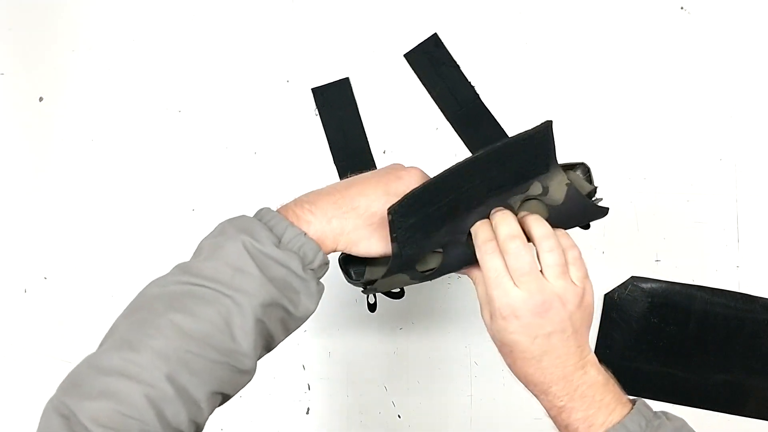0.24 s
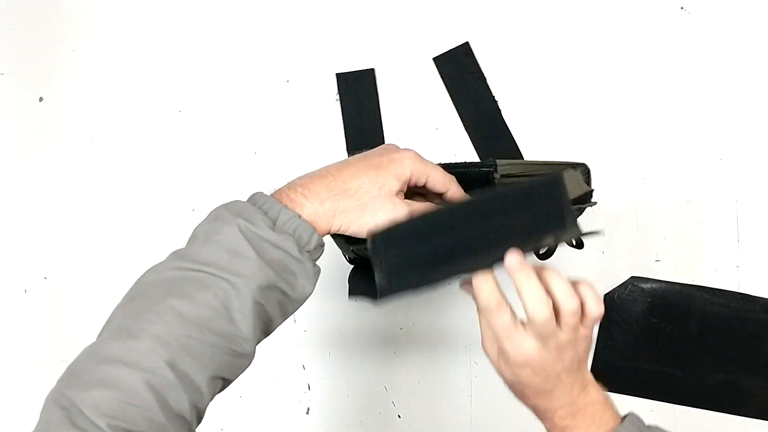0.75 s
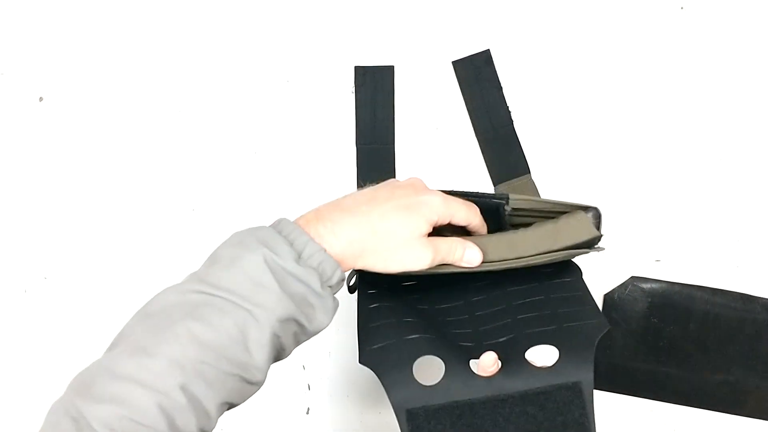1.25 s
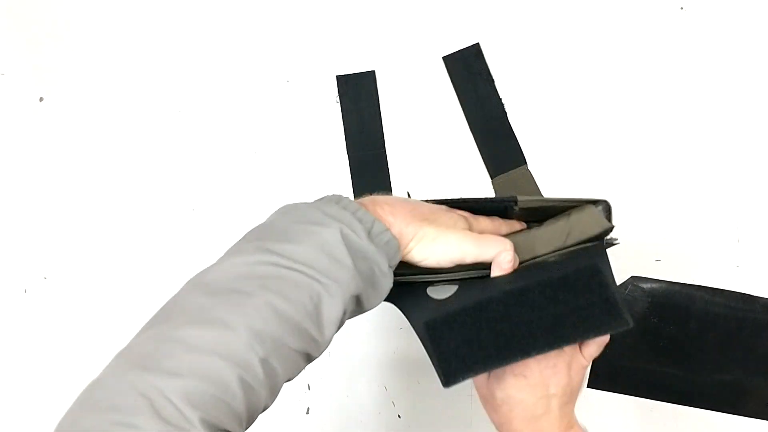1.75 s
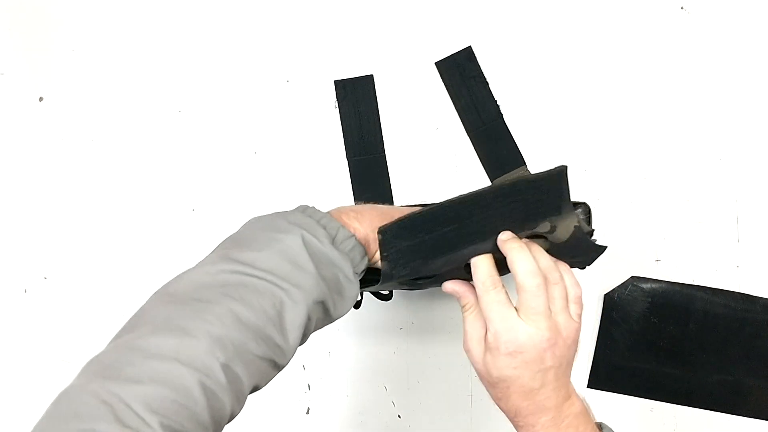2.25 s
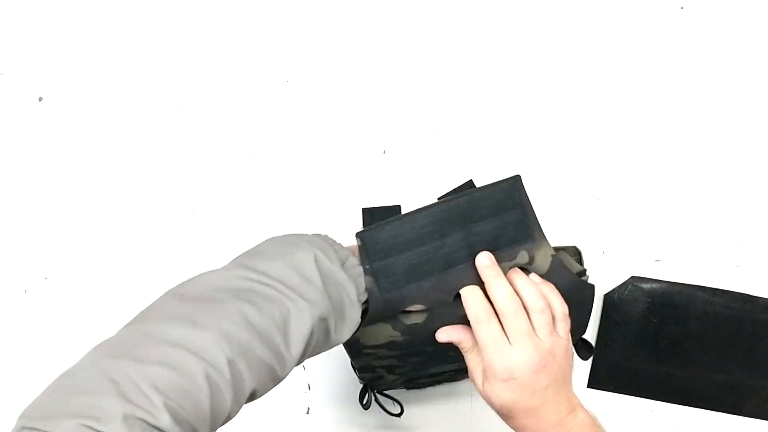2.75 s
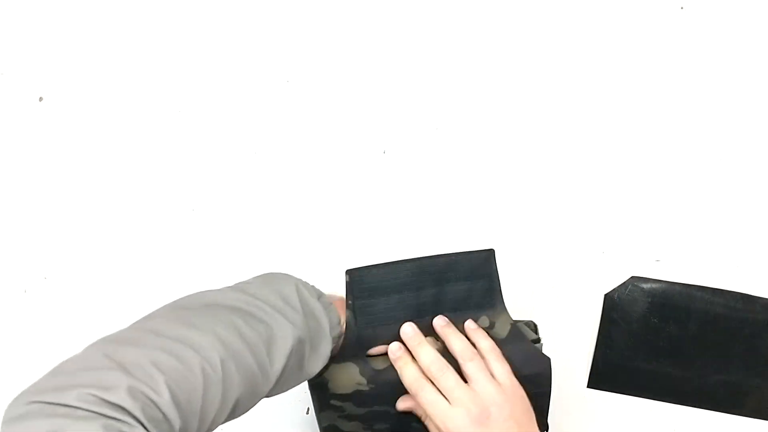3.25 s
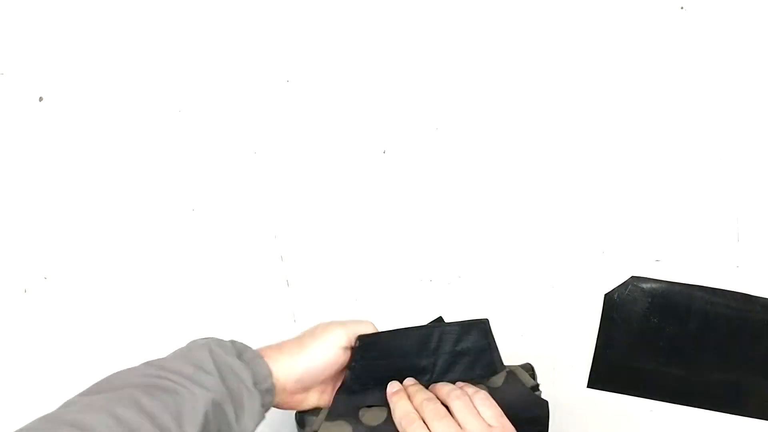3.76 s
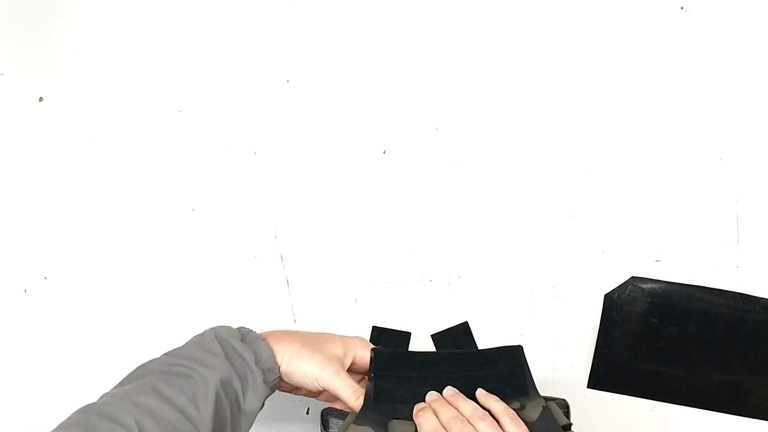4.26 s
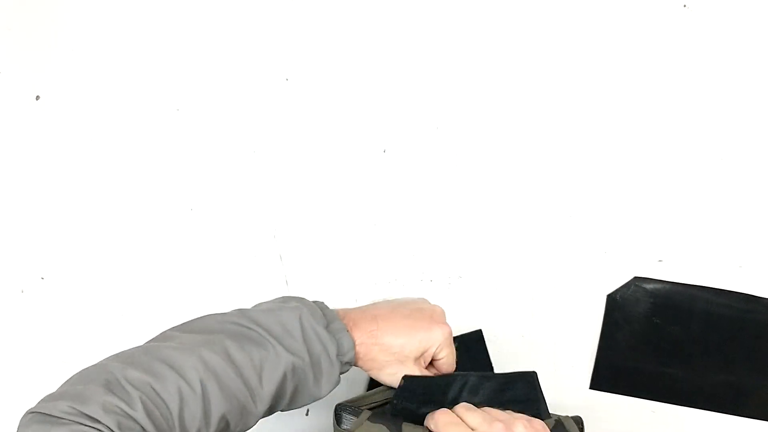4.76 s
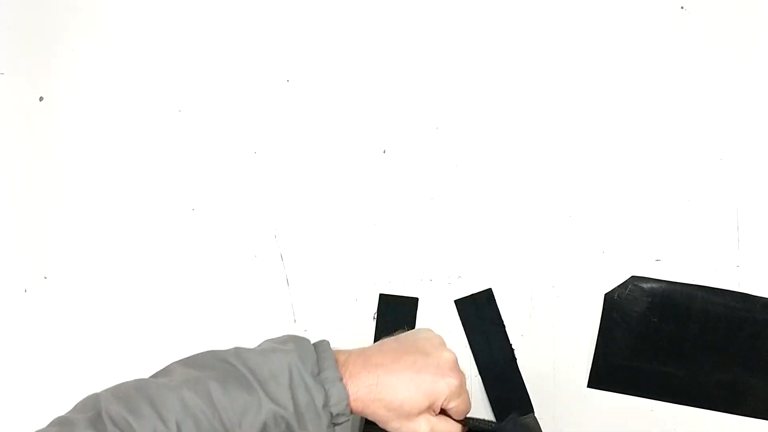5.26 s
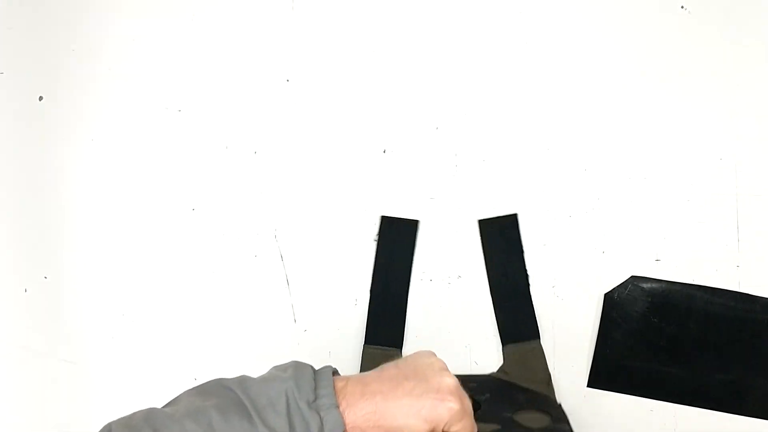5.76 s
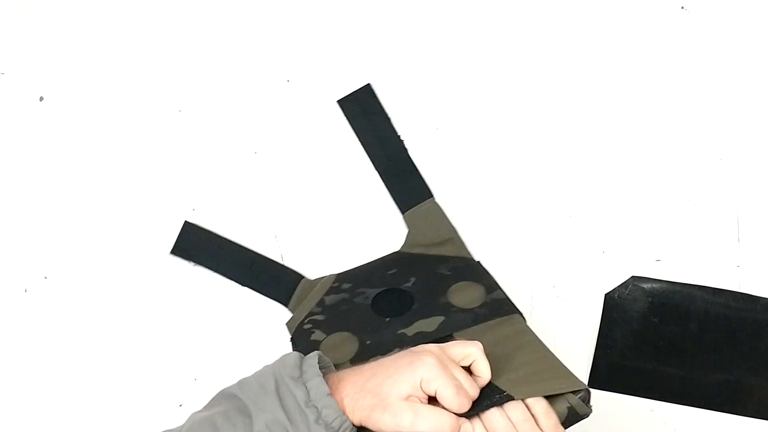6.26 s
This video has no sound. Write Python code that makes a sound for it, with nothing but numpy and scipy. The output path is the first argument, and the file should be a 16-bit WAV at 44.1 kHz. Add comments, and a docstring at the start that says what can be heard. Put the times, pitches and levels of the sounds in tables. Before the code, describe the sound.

Short hook-and-loop tearing, quiet cloth rubbing, then harder scraping, snapping and knocking of a stiff padded fabric vest, set down softly in a small room.

```python
"""A padded fabric vest is handled on a table in a small room, over a low rumble and a faint, cricket-like chirping.
After faint rubbing and ticks its hook-and-loop flap is ripped open: rows of tiny slips ring the taut flap.
Then a hand pushes into the stiff nylon pocket and drags about, quietly first and harder later: clumped slips
rub, scrape, hiss and sizzle, with snaps, flicks and padded knocks. Last, the vest lands with a soft thump:
decaying low modes of the table top."""
import sys
import numpy as np
from scipy import signal
from scipy.fft import rfft, irfft
from scipy.io import wavfile

SR = 44100
rng = np.random.default_rng(int(sys.argv[2]) if len(sys.argv) > 2 else 0)


def waveform_to_disk(signal):
    """Save audio, clipped to [-1, 1], as 16-bit WAV at the path in sys.argv[1]."""
    frames = np.transpose(np.atleast_2d(signal))
    scaled = np.clip(frames, -1, 1) * 32767
    samples = np.round(scaled).astype(np.int16)
    wavfile.write(sys.argv[1], SR, samples)


N = 287532
TIME = np.arange(N) / SR


def from_db(db):
    """Amplitude factor of a level in dB."""
    return 10 ** (np.asarray(db) / 20)


def rms_one(x):
    """Scale to an rms of 1."""
    return x / np.sqrt(np.mean(x ** 2) + 1e-20)


def at_hz(points, hz):
    """Read a curve of (Hz, value) points along a logarithmic frequency axis."""
    point_hz, values = np.transpose(points)
    return np.interp(np.log(hz + 1), np.log(point_hz), values)


def band(x, low, high, order=2):
    """Keep the band from low to high, in Hz."""
    sos = signal.butter(order, [low, high], "band", fs=SR, output="sos")
    return signal.sosfilt(sos, x + 1e-18)


def highpass(x, hz):
    """Gentle first-order cut of the bass."""
    return signal.sosfilt(signal.butter(1, hz, "high", fs=SR, output="sos"), x)


def drift(rate):
    """Slow chance with an rms of 1, heading for a new random value at this rate per second."""
    knots = np.arange(0, N / SR + 1, 1 / rate)
    return rms_one(np.interp(TIME, knots, rng.standard_normal(len(knots))))


def resonance(x, hz, width):
    """Two-pole resonance with a gain of 1 on top; pitch and width in Hz."""
    r = np.exp(-np.pi * width / SR)
    numerator = np.array([1, 0, -1]) * (1 - r * r) / 2
    denominator = [1, -2 * r * np.cos(2 * np.pi * hz / SR), r * r]
    return signal.lfilter(numerator, denominator, x + 1e-18)


def click_of(spectrum, resonances=(), size=4096):
    """The causal click that has this spectrum, with resonances ringing on top."""
    cepstrum = irfft(np.log(from_db(at_hz(spectrum, np.fft.rfftfreq(size, 1 / SR)))))
    # folding the cepstrum onto positive times gives minimum phase: the energy comes first
    folded = cepstrum * (1 + np.sign(np.fft.fftfreq(size)))
    click = irfft(np.exp(rfft(folded)))
    return click + sum(from_db(db) * resonance(click, hz, width) for hz, width, db in resonances)


def play(force, click):
    """Every pulse of the force sounds the stereo click."""
    return signal.oaconvolve(force[None], click, axes=1)[:, :N]


def grains(per_s, spread_db):
    """Tiny slips at random moments, a few much larger than the rest; rms 1."""
    sizes_db = spread_db * np.minimum(rng.exponential(1, N), 4)
    sizes = from_db(sizes_db) * rng.choice([-1, 1], N)
    return rms_one(sizes * (rng.random(N) < per_s / SR))


def bursts(times, levels_db, lengths, per_s, spread_db, rise_share=0.23):
    """Avalanches of slips that swell quickly and die away; each length is a decay time in seconds."""
    out, slips = np.zeros(N), grains(per_s, spread_db)
    for s, db, length in zip(times, levels_db, lengths):
        at = int(s * SR)
        age = TIME[:min(N - at, SR // 10)]
        fall = np.exp(-age / length)
        rise = -np.expm1(-age / (rise_share * length))
        burst = slips[at:at + len(age)] * fall * rise
        # the energy follows level and length, however the slips happen to fall
        out[at:at + len(age)] += from_db(db) * burst * np.linalg.norm(fall) / (np.linalg.norm(burst) + 1e-9)
    return out


def diffuse(size, apart_hz=1300, bass_side_db=-18):
    """Noise from all around at two close microphones: alike in the bass, unrelated in the treble."""
    mid, side = rng.standard_normal((2, size))
    side = highpass(side, apart_hz) + from_db(bass_side_db) * side
    return mid + side * [[1], [-1]]


def radiate(force, click, scatter_db, left_lag_s, count=7, size=400):
    """The slipping hops from spot to spot; each arrives with its own scatter off hands and table."""
    age, out = TIME[:SR // 40], 0
    spots = np.repeat(rng.integers(0, count, N // size + 1), size)[:N]  # a new spot every 400 samples
    arrival = 0.0005 + np.array([[left_lag_s], [0]])
    for spot in range(count):
        scatter = diffuse(size=len(age)) * np.exp(-np.maximum(age - arrival, 0) / 0.0039) * (age > arrival)
        direct = np.sinc((age - arrival) * SR)
        path = direct + from_db(scatter_db) * scatter / np.linalg.norm(scatter[0])
        heard = signal.fftconvolve(click[None], path, axes=1)
        heard = heard * np.sqrt(2) / np.linalg.norm(heard)
        out = out + play(force * (spots == spot), heard)
    return out


# How long the small room rings. Each row: frequency in Hz, 60 dB decay time in seconds.
ROOM_DECAY = [(150, 0.28), (1000, 0.18), (4500, 0.27), (15000, 0.16)]


def in_room(x, right_db, tail_db):
    """Direct sound with its treble leaning right by right_db, then a noise tail that decays band by band."""
    age = TIME[:SR // 2]
    noise, edges = diffuse(size=len(age)), np.geomspace(60, 18000, 9)
    tail = 0
    for low, high in zip(edges, edges[1:]):
        t60 = at_hz(ROOM_DECAY, np.sqrt(low * high))
        tail = tail + band(noise, low, high) * np.exp(-np.log(1000) * age / t60)
    tail = tail * np.clip(age / 0.0031, 0, 1)  # the tail builds up over 3.1 ms
    tail = tail / np.linalg.norm(tail[0])
    side_gain = from_db(np.array([[-right_db], [right_db]]) / 2)
    direct = x + highpass(x, 1800) * (side_gain - 1)
    return direct + from_db(tail_db) * signal.fftconvolve(x, tail, axes=1)[:, :N]


# Colour of the room's own rumble. Each row: frequency in Hz, relative level in dB per Hz.
RUMBLE_SPECTRUM = [(25, -8), (45, -11), (70, 1.5), (130, 3), (220, -5.5), (700, -10), (1400, -24.5),
                   (5000, -23), (8000, -26.5), (16000, -35)]


def room_rumble(level_db=-69):
    """Steady noise from all around, coloured heavily towards the bass."""
    noise = signal.oaconvolve(diffuse(size=N), click_of(RUMBLE_SPECTRUM)[None], axes=1)[:, :N]
    return from_db(level_db) * rms_one(noise)


def chirping(hz=6400, width_hz=260, before_gating_db=-71):
    """Faint narrow-band noise pulsed into chirps, about seven a second, each with a short fade."""
    age = (TIME - 0.06) % 0.1395
    rise = np.clip(age / 0.0074, 0, 1)
    fade = np.exp(-np.maximum(age - 0.05, 0) / 0.012)
    tone = resonance(resonance(rng.standard_normal((2, N)), hz, width_hz), hz, width_hz)
    return from_db(before_gating_db) * rise * fade * rms_one(tone)


# The vest landing on the table. Each row: start in seconds, level in dB.
LANDINGS = [(6.3771, -39), (6.380, -31.5), (6.393, -41.5)]
# Modes of the table top. Each row: pitch in Hz, relative level in dB, 60 dB decay time in seconds.
TABLE_MODES = [(84, -7, .11), (142, -1, .1), (270, -5, .06), (365, -1, .07), (440, -7, .03),
               (702, -8, .045)]


def thump():
    """The soft landing sets the low modes of the table top ringing."""
    out = np.zeros(N)
    for s, db in LANDINGS:
        at = int(s * SR)
        age = TIME[:N - at]
        for hz, mode_db, t60 in TABLE_MODES:
            ring = np.cos(2 * np.pi * hz * age) * np.exp(-np.log(1000) * age / t60)
            out[at:] += from_db(db + mode_db) * ring
    return band(out, 49, 655, order=4)


# Fingers and the stiff panel knocking. Each row: start in seconds, dry peak level in dB, pitch in Hz.
KNOCKS = [(0.713, -55.5, 100), (1.138, -46, 101), (1.399, -47, 109), (2.4356, -43.5, 990),
          (2.6299, -34.5, 1140), (2.659, -43.5, 1090), (2.696, -36.5, 1130), (2.895, -44, 376),
          (1.864, -51, 316), (4.331, -39, 238), (4.5197, -26.5, 355), (4.669, -27.5, 234),
          (5.457, -37, 106), (5.745, -32, 730)]


def taps(width_share=0.32):
    """A knock on padding rings for only a cycle or two; its resonances are wide for their pitch."""
    out = np.zeros(N)
    for s, db, hz in KNOCKS:
        wide = resonance(signal.unit_impulse(SR // 10), hz, hz * width_share * 2)
        knock = resonance(wide, hz, hz * width_share)
        at = int(s * SR)
        out[at:at + len(knock)] += from_db(db) * knock / np.abs(knock).max()
    return out


# Stiff edges and fingernails flicking. Each row: start in seconds, level in dB, decay time in seconds.
EDGE_TICKS = [(0.383, -63, 0.0054), (0.423, -61, 0.012), (0.706, -60, 0.011), (1.771, -40, 0.0064),
              (1.86, -42, 0.0048), (1.872, -39, 0.0032), (3.7307, -29, 0.0027), (3.808, -49.5, 0.0035),
              (4.156, -50.5, 0.0065), (4.203, -53, 0.0093), (5.209, -33.5, 0.0041), (5.952, -36, 0.0046)]
# Colour of a stiff edge. Each row: frequency in Hz, relative level in dB per Hz.
EDGE_SPECTRUM = [(150, 1.5), (1000, 0.5), (3000, 0), (8500, 0.5), (11500, -9), (16000, -6.5)]


def flicks():
    """A stiff edge flicks free in a brief, very bright tick."""
    force = bursts(*np.transpose(EDGE_TICKS), per_s=4000, spread_db=4.0)
    return radiate(force, band(click_of(EDGE_SPECTRUM), 155, 21050), scatter_db=2.5, left_lag_s=0)


def swell(s, length, swell_share=0.53, roundness=1.55):
    """Speed of one hand movement: it swells to 1 at its fastest moment, then eases off."""
    reach = length * np.where(TIME < s, swell_share, 1 - swell_share)
    return np.exp(-np.abs((TIME - s) / reach) ** roundness)


# Pulls that peel the flap. Each row: fastest moment in seconds, relative level in dB, length in seconds.
FLAP_PULLS = [(1.121, -50, 0.14), (1.252, -35.5, 0.049), (1.302, -50, 0.26), (1.412, -42, 0.076)]
# Rows of hooks letting go together. Each row: start in seconds, relative level in dB.
HOOK_ROWS = [(1.043, -41.5), (1.082, -35.5), (1.096, -44), (1.128, -29.5), (1.142, -30.5), (1.175, -33),
             (1.218, -33), (1.226, -31), (1.241, -28.5), (1.361, -36), (1.367, -28), (1.396, -27)]
# Colour of the hooks. Each row: frequency in Hz, relative level in dB per Hz.
HOOK_SPECTRUM = [(100, -1), (500, -9), (1000, -6.5), (2200, -4.5), (3500, -2), (4800, 1), (7000, -1),
                 (9500, -0.5), (12000, -10.5), (15500, -17)]
# Resonances of the taut flap. Each row: pitch in Hz, width in Hz, gain in dB.
FLAP_RESONANCES = [(96, 56, 5), (251, 40, 14), (355, 24, 14.5), (730, 29, 14.5), (1290, 160, 4)]


def flap(row_decay_s=0.0043):
    """Hooks snap out of their loops, singly and by rows, and shake the taut flap."""
    peel = sum(from_db(db) * swell(s, length) for s, db, length in FLAP_PULLS)
    unevenness = rms_one(from_db(1.5 * drift(180)))
    single_hooks = peel * grains(per_s=2000, spread_db=4.5) * unevenness
    decays = np.full(len(HOOK_ROWS), row_decay_s)
    hook_rows = bursts(*np.transpose(HOOK_ROWS), decays, per_s=4000, spread_db=3.5)
    click = band(click_of(HOOK_SPECTRUM, FLAP_RESONANCES), 84, 19000)
    return from_db(-1.5) * radiate(single_hooks + hook_rows, click, scatter_db=0.5, left_lag_s=-0.00004)


# Sizzle is the top of the treble: its level against the hiss, and the dB it loses per dB of bite.
SIZZLE_DB, SIZZLE_LOSS = -6.5, 0.87


def contact_db(db, bright_db, bite_db):
    """Rub, scrape, hiss, sizzle in dB: brightness trades rub for hiss; bite lifts scrape, smothers sizzle."""
    hiss_db = db + bright_db
    sizzle_db = hiss_db + SIZZLE_DB - SIZZLE_LOSS * bite_db
    return np.array([db - bright_db, db + bite_db, hiss_db, sizzle_db])


# Strokes of cloth over cloth; a thin edge sounds bright, flat padding dull, and pressing makes the weave bite.
# Each row: fastest moment in seconds, relative level in dB, length in seconds, brightness in dB, bite in dB.
CLOTH_STROKES = [(0.145, -75, 0.12, -0.5, 0.5), (0.235, -70, 0.028, -2.5, -2.5), (0.49, -80, 0.15, 3, 2),
                 (0.595, -64.5, 0.056, -1, -3.5), (1.86, -65.5, 0.18, 8, 3.5), (2.323, -62.5, 0.14, 2.5, 6),
                 (2.4, -68, 0.072, -9, 5), (2.617, -64, 0.061, -4, 5), (2.73, -67.5, 0.35, 0.5, 3.5),
                 (3.01, -64, 0.068, 5, 6), (3.12, -71, 0.47, 1.5, 4.5), (3.489, -62, 0.087, 0.5, 3),
                 (3.544, -59.5, 0.12, -4.5, 0.5), (3.646, -58.5, 0.059, -2.5, 3.5),
                 (3.776, -64.5, 0.088, 6.5, 0), (4.008, -62, 0.021, -1, 5.5), (4.346, -48, 0.037, -8, 2),
                 (4.419, -42, .07, 1.5, 8.5), (4.542, -44, 0.21, 3.5, 6), (4.693, -40.5, 0.089, -2.5, 1),
                 (4.728, -38, 0.026, 2, -2.5), (4.79, -45.5, 0.098, -2.5, -3.5),
                 (4.871, -38, 0.033, 2, -1.5), (4.976, -47, 0.064, 3.5, -3),
                 (5.061, -38.5, 0.042, -1.5, -0.5), (5.086, -38, 0.064, 1.5, 2.5),
                 (5.235, -50, 0.072, 4.5, -4), (5.372, -41.5, 0.034, 1.5, -0.5),
                 (5.451, -33.5, 0.069, 0.5, 1.5), (5.57, -47, 0.18, 1, -3.5),
                 (5.642, -46.5, 0.089, 1.5, 2.5), (5.749, -53, 0.095, -9.5, 0.5),
                 (6.009, -54.5, 0.12, 1.5, 1), (6.106, -46.5, 0.069, 2.5, 0), (6.41, -59, 0.13, -2, 2.5)]


def bite_at(s):
    """The pressure of the hand passes smoothly from one stroke to the next."""
    stroke_s, *_, bite_db = np.transpose(CLOTH_STROKES)
    return np.interp(s, stroke_s, bite_db)


# Light rustle of the held vest between the strokes. Each row: time in seconds, relative level in dB.
HELD_RUSTLE = [(0, -94), (0.84, -85), (0.9, -74), (2.5, -77.5), (3.92, -73), (4.31, -70.5), (4.7, -58),
               (5.8, -58.5), (6.2, -66.5), (6.52, -74)]


def sliding(rustle_bright_db=1, rustle_bite_share=0.58):
    """Strength of rub, scrape, hiss and sizzle over time: all strokes on top of the light rustle."""
    rustle_db = np.interp(TIME, *np.transpose(HELD_RUSTLE))
    rustle = from_db(contact_db(rustle_db, rustle_bright_db, rustle_bite_share * bite_at(TIME)))
    power = rustle ** 2
    for s, db, length, bright_db, bite_db in CLOTH_STROKES:
        stroke = np.outer(from_db(contact_db(db, bright_db, bite_db)), swell(s, length))
        power = power + stroke ** 2
    return np.sqrt(power)


# Folds and seams catching and snapping free.
# Each row: start in seconds, relative level in dB, decay time in seconds, brightness in dB.
FOLD_CATCHES = [(2.696, -52, 0.007, -9.5), (2.894, -62, 0.0068, -11), (2.991, -52, 0.0037, -7),
                (3.011, -49.5, 0.0043, -1.5), (3.299, -54.5, 0.019, -1.5), (3.522, -50.5, 0.0056, -9),
                (4.36, -39.5, 0.01, -3.5), (4.467, -38.5, 0.0059, -1), (4.493, -31.5, 0.0034, -1),
                (4.517, -31, 0.003, -6), (4.573, -31, 0.0048, 1.5), (4.598, -32.5, 0.0041, -1.5),
                (4.618, -28, 0.0022, -2.5), (4.665, -27, 0.0067, -1), (4.864, -34, 0.0075, 7),
                (5.09, -25.5, 0.0042, 0.5), (5.117, -32.5, 0.0051, 1), (5.359, -32.5, 0.0064, -5.5),
                (5.428, -38, .0026, 10), (5.463, -30.5, 0.0023, 8), (5.469, -31, .003, 1),
                (5.481, -25.5, 0.00094, 5)]
# Colour of the stiff nylon. Each row: frequency in Hz, relative level in dB per Hz.
NYLON_SPECTRUM = [(50, -14), (90, -15), (200, -0.5), (400, -2), (700, -3), (1400, -4.5), (2500, -7.5),
                  (3200, -10.5), (4600, -7), (6300, -9), (8400, -7.5), (10000, -16), (12500, -23),
                  (15000, -23.5)]
# Fixed resonances that colour the cloth sounds, as from close reflections.
# Each row: pitch in Hz, width in Hz, gain in dB.
CLOTH_RESONANCES = [(354, 39, -5), (725, 36, 2.5), (1490, 22, -24), (2307, 27, -1), (2628, 62, -2)]
# Bands of rub, scrape, hiss and sizzle. Each row: low edge in Hz, high edge in Hz.
CLOTH_BANDS = [(55, 1000), (1000, 4500), (4500, 9500), (9500, 17000)]


def cloth():
    """The weave sticks and slips in clumps; folds add sudden snaps, with the bite of the stroke under way."""
    s, db, length, bright_db = np.transpose(FOLD_CATCHES)
    snap_levels = contact_db(db, bright_db, bite_at(s))
    clumps = rms_one(from_db(2.46 * drift(300)))
    weave = grains(per_s=5500, spread_db=3.5) * clumps
    click, out = click_of(NYLON_SPECTRUM, CLOTH_RESONANCES), 0
    for (low, high), slide, snap_db in zip(CLOTH_BANDS, sliding(), snap_levels):
        snaps = bursts(s, snap_db, length, per_s=8000, spread_db=2.5)
        force = from_db(-0.5) * slide * weave + snaps
        out = out + radiate(force, band(click, low, high, order=3), scatter_db=-2.0, left_lag_s=0.00002)
    return out


def scene():
    """Flap, cloth and knocks sound a little right of centre, over the rumble and the chirping."""
    background = room_rumble() + chirping()
    knocks = in_room(np.tile(taps() + thump(), (2, 1)), right_db=8.0, tail_db=-4.0)
    ripping = in_room(flap(), right_db=6.0, tail_db=-3.5)
    handling = in_room(cloth() + flicks(), right_db=4.5, tail_db=-5.0)
    return background + knocks + ripping + handling


def record(dry, cutoff_hz=15900):
    """The top of the treble is cut steeply."""
    return signal.sosfilt(signal.ellip(12, 0.1, 80, cutoff_hz, fs=SR, output="sos"), dry)


dry = scene()
out = record(dry)
waveform_to_disk(out)
```